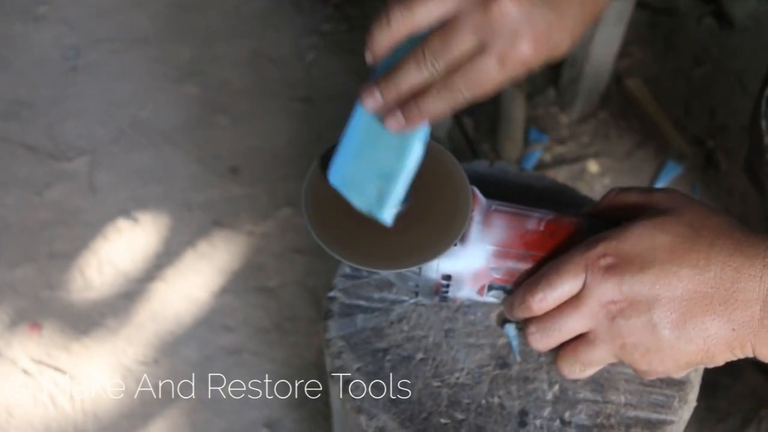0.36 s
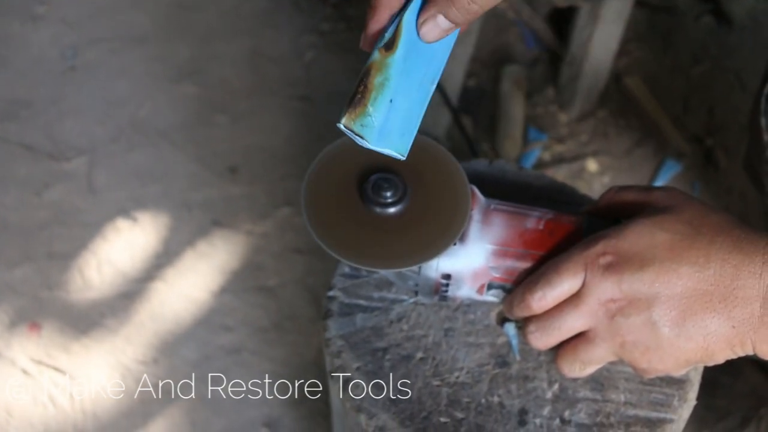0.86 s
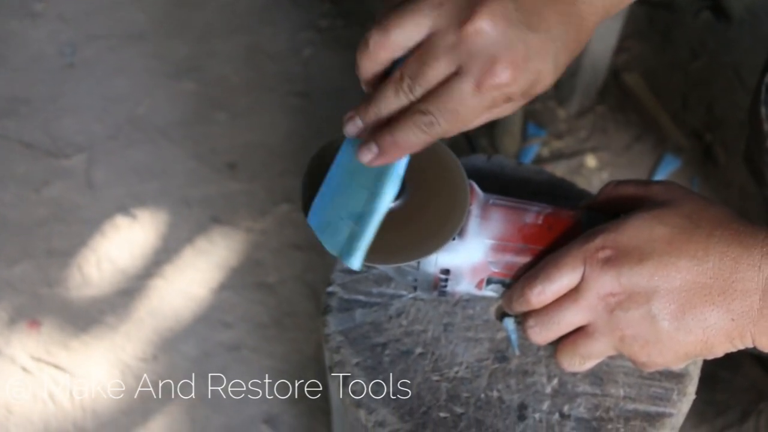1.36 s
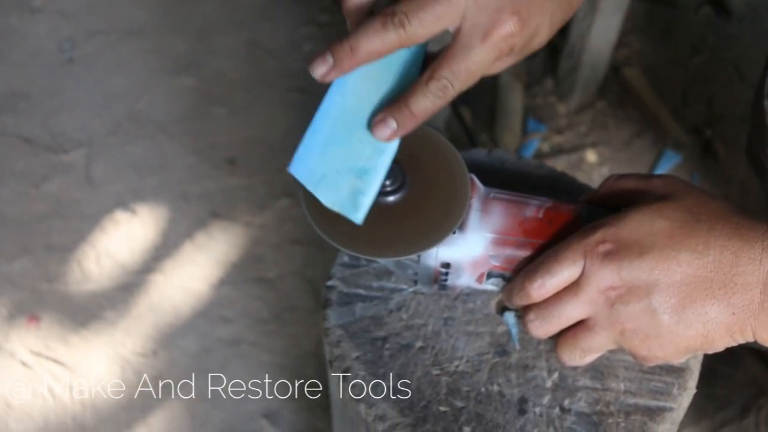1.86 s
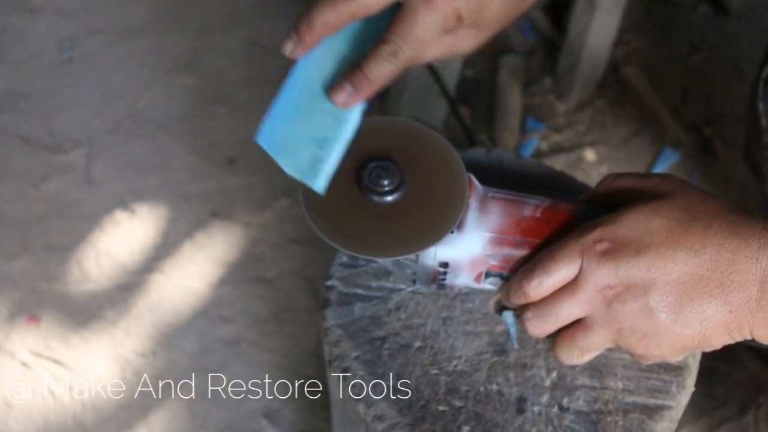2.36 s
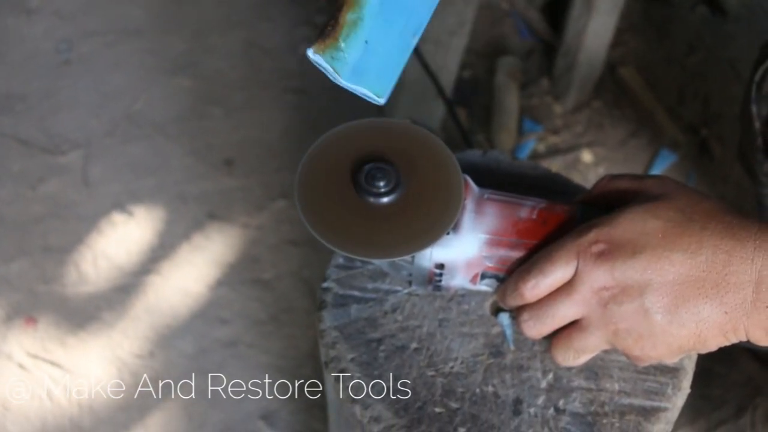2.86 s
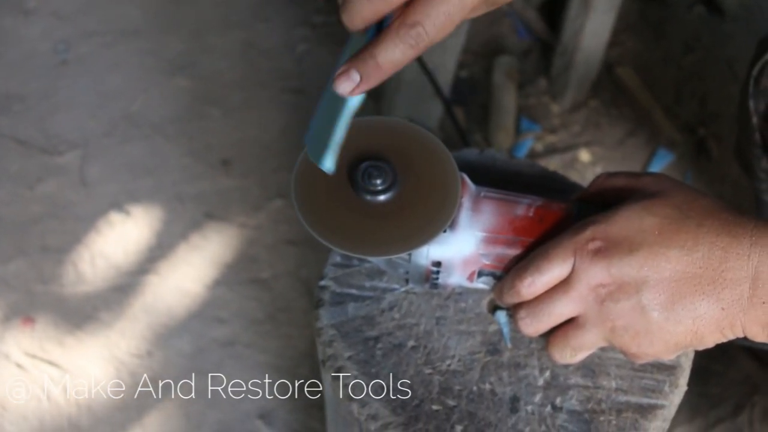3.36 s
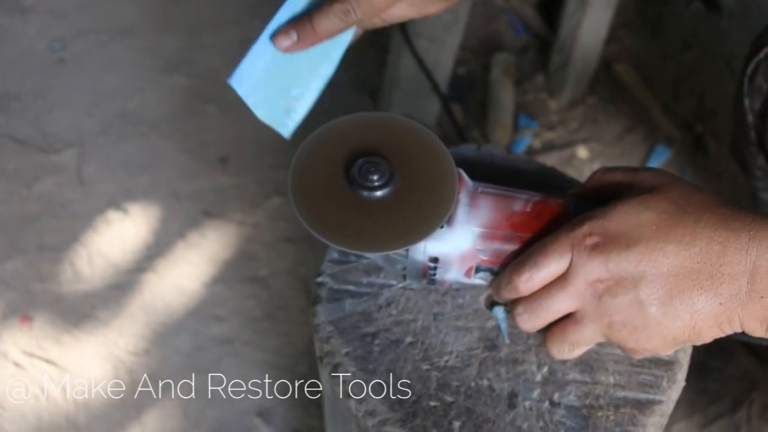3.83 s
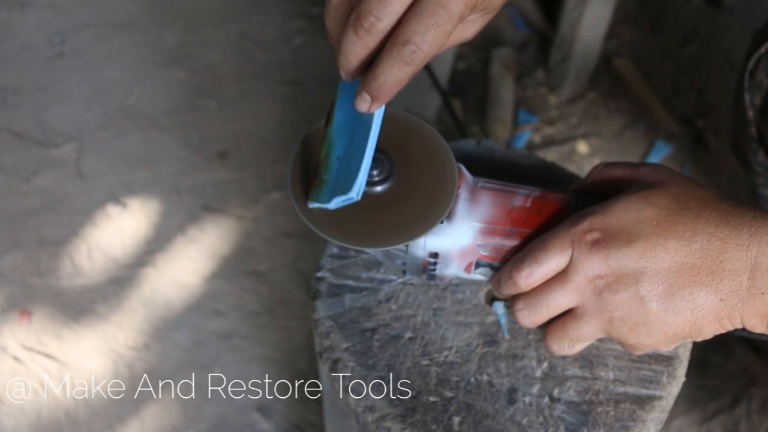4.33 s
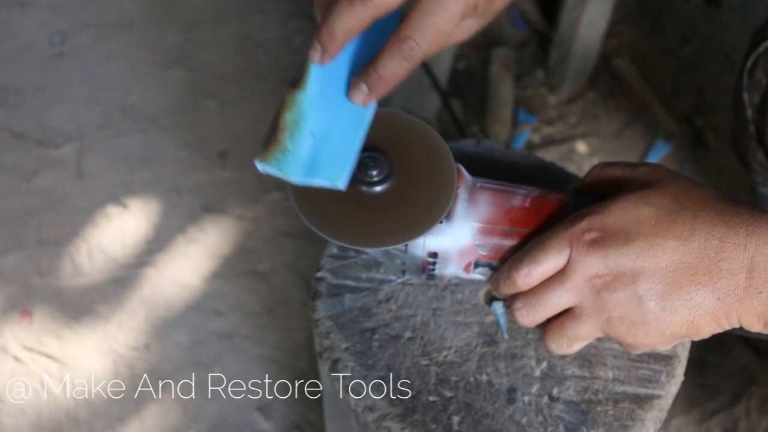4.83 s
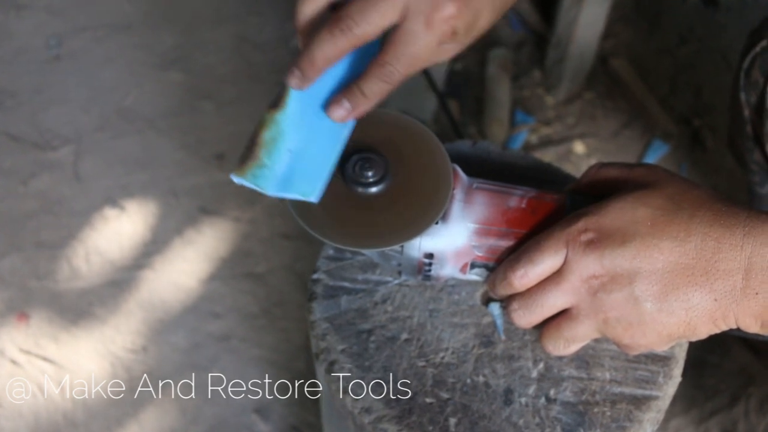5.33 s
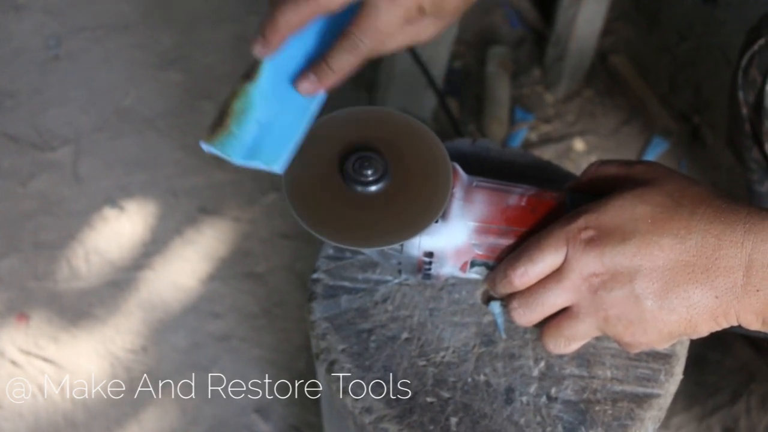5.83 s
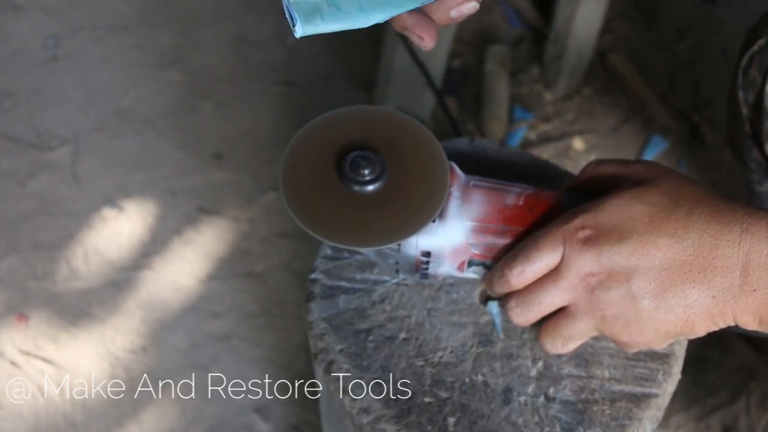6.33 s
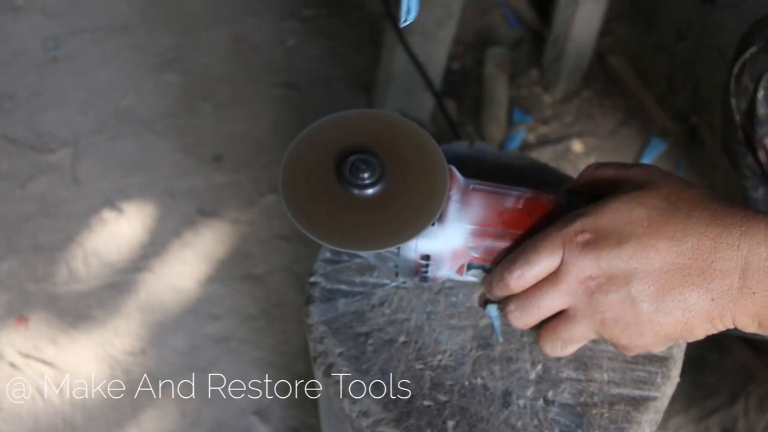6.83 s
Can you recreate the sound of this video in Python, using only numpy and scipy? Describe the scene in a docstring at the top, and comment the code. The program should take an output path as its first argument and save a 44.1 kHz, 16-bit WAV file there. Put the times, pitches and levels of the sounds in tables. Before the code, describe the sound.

Close, mono and dry: a free-running electric grinder with a shrill blade whine, fainter higher overtone and broad airy roar. Brief scratchy zips of plastic on abrasive come singly and in clusters, strongest at the start and in the sixth second, with gaps of plain whirring between. Low room rumble and soft distant wooden thumps sit underneath; the last second is just the motor.

```python
"""A small angle grinder runs free on a wooden block in a workshop: a fan roar, a blade whine, bar and shaft tones.
Plastic pipe is swept over its abrasive disc in short strokes: noise shaped by disc modes hisses, narrow tones squeal,
and the motor, whose armature phase drives every steady tone, slows down.
Far off something knocks on wood, as soft puffs of low noise, over a low rumble of block and room.
One microphone takes it all in mono; its automatic gain control ducks the loud moments and recovers slowly."""
import sys
import numpy as np
from scipy import signal
from scipy.fft import rfft, irfft, next_fast_len
from scipy.io import wavfile
from scipy.ndimage import uniform_filter1d, map_coordinates

SR = 44100
rng = np.random.default_rng(int(sys.argv[2]) if len(sys.argv) > 2 else 0)


def amp(db):
    return 10 ** (np.asarray(db, float) / 20)


def write(x):
    x = np.atleast_2d(x).T
    wavfile.write(sys.argv[1], SR, np.round(np.clip(x, -1, 1) * 32767).astype(np.int16))


N = 306495  # length in samples

BLADES, DISC_PER_ARMATURE = 12, 13 / 37  # fan blades, disc turns for one armature turn
MAINS_BEAT_HZ = 100  # torque pulses at twice the mains
START_WHINE_HZ, RECOVER_S = 5795, 0.6  # whine at the start, time constant of the motor speed
BARS_DB, SHAFT_DB = -32, -41  # mean rms at the microphone: commutator bars, armature unbalance
BAND_TOP_HZ = 15730  # upper limit of the recorded band

# The speed the motor heads for; it sags when the pipe brushes the disc too lightly to hiss.
# Each row: time in seconds, blade whine in Hz.
FREE_SPEED = [(0.0, 5880), (0.96, 5885), (1.12, 5984), (2.75, 5926), (3.25, 5962), (4.19, 5952),
              (4.83, 5844), (5.12, 5985), (7.0, 5977)]
# The pipe brakes the disc. Each row: start in seconds, end in seconds, whine Hz lost a second.
BRAKING = [(0, .065, 1000), (.312, .433, 663), (1.449, 1.607, 289), (2.023, 2.106, 321), (2.29, 2.361, 520),
           (2.53, 2.608, 757), (3.745, 3.845, 92), (4.288, 4.492, 55), (4.511, 4.679, 243),
           (5.015, 5.15, 340), (5.32, 5.426, 325), (5.578, 5.685, 491), (5.798, 5.894, 639)]
# Blade whine, shaded and reflected by the moving hand and pipe. Each row: time in seconds, level in dB.
WHINE = [(0, -15.5), (.08, -22.5), (.2, -18.5), (.45, -25), (.75, -19), (1.1, -20.5), (1.28, -22.5),
         (1.48, -18), (1.62, -21.5), (2.15, -22), (2.45, -23.5), (2.9, -23), (3.19, -18.5), (3.38, -21.5),
         (3.56, -18.5), (3.72, -21.5), (3.93, -19.5), (4.3, -21.5), (4.75, -22), (5.9, -23.5), (6.2, -21.5),
         (6.9, -23.5)]
# Weaker steady tones of the motor. Each row: multiple of the armature speed, level in dB.
ARMATURE_ORDERS = [(2, -41.5), (3, -52), (4, -50), (5, -46), (6, -48), (7, -48), (13.71, -53)]
# Unbalance of the disc. Each row: multiple of the disc speed, level in dB.
DISC_ORDERS = [(1, -67.5), (2, -61.5)]
# Fan roar while hand and pipe shade the air slots. Each row: time in seconds, level from 700 to 2000 Hz in dB.
ROAR = [(0, -24.5), (.45, -28), (.7, -26.5), (1.5, -27), (1.65, -28), (2.4, -28), (3.2, -26.5),
        (4.5, -27.5), (4.75, -28.5), (4.95, -27), (5.5, -28), (6.95, -26.5)]
# Spectrum of the cooling air. Each row: frequency in Hz, relative density in dB per Hz.
AIR = [(150, -64), (250, -24), (458, -18.5), (483, -19), (626, -15), (901, -8.5), (2220, -10), (5460, -6.5),
       (5750, -6), (6600, -10), (11100, -20), (12100, -15), (15700, -18.5)]
# Housing resonances and dips that colour the roar. Each row: frequency in Hz, width in Hz, lift in dB.
HOUSING = [(831, 270, 7), (1526, 640, 5.5), (1946, 270, 6.5), (2690, 310, 2.5), (3200, 83, -2.5),
           (3380, 510, 3.5), (4140, 360, 3.5), (4320, 170, -3), (4850, 330, 4.5), (6570, 120, -3),
           (6940, 280, -6), (8500, 2900, 8), (13900, 980, 4)]
# Strokes of the pipe over the disc. Each row: start in seconds, end in seconds,
# then the drive of the low, middle and high modes in dB.
STROKES = [(0, 0.07, -18, -24.5, -23), (.297, 0.407, -21, -24.5, -28.5), (.412, 0.45, -22, -31, -31),
           (1.42, 1.606, -28, -28, -30.5), (1.984, 2.112, -26, -29, -26), (2.272, 2.28, -29, -24, -22),
           (2.288, 2.355, -22, -26, -26), (2.518, 2.6, -21, -29, -25), (3.73, 3.81, -21.5, -25, -25),
           (4.292, 4.454, -31, -30, -26.5), (4.455, 4.61, -37.5, -32, -28), (4.652, 4.698, -38, -34, -27),
           (4.983, 5.1, -29.5, -28.5, -26), (5.1, 5.158, -23, -28, -22), (5.31, 5.331, -30, -21, -19),
           (5.328, 5.417, -27, -26, -26), (5.55, 5.686, -25.5, -27, -27), (5.797, 5.89, -26, -26, -24)]
# Modes of the rubbed disc and pipe. Each row: frequency in Hz, width in Hz, relative gain in dB.
DISC_MODES = [(2250, 700, 4.5), (4400, 460, 5), (6350, 260, 14.5), (8300, 1030, 8), (9050, 1000, 3),
              (10400, 290, -13), (12900, 290, 6), (13800, 680, 3.5), (14400, 240, 1), (14900, 450, -3)]
# Broad scrape of the grit under the modes. Each row: frequency in Hz, width in Hz, relative gain in dB.
SCRAPE = [(3670, 1500, 0.5), (8000, 2100, 3), (13800, 2600, -4)]
# The pipe edge sticks, slips and sings. Each row: start in seconds, end in seconds, frequency in Hz,
# peak level in dB before it turns unsteady.
SQUEALS = [(.005, 0.054, 3720, -23), (.023, .06, 5030, -30), (0, .07, 6350, -22), (.326, .388, 6740, -27),
           (.34, .4, 8450, -28), (1.427, 1.58, 8900, -33), (1.995, 2.04, 9050, -23),
           (1.997, 2.1, 13850, -37), (2, 2.06, 2140, -30), (2.294, 2.345, 6300, -21),
           (2.272, 2.348, 7880, -26), (2.33, 2.37, 13400, -30), (2.523, 2.602, 6350, -25),
           (2.55, 2.587, 7660, -23), (4.3, 4.44, 13800, -39), (4.46, 4.6, 15150, -40),
           (4.5, 4.615, 14400, -39), (4.655, 4.69, 14050, -39), (4.995, 5.09, 8970, -27.5),
           (4.99, 5.1, 13800, -35), (5.03, 5.1, 10400, -32), (5.113, 5.16, 9400, -31),
           (5.032, 5.096, 2270, -28), (5.313, 5.407, 4400, -25), (5.322, 5.396, 2250, -29),
           (5.35, 5.397, 9300, -25), (5.58, 5.632, 4710, -27), (5.622, 5.657, 4360, -22),
           (5.58, 5.633, 6330, -30), (5.63, 5.66, 9130, -25), (5.795, 5.845, 4700, -24),
           (5.82, 5.883, 4400, -21), (5.85, 5.883, 8960, -23)]
# Far blows on wood. Each row: time of the peak in seconds, rms level at the peak in dB.
KNOCKS = [(0.284, -31), (0.765, -35), (1.244, -37.5), (1.76, -41), (2.204, -43), (2.721, -34),
          (3.188, -29.5), (3.652, -38), (4.137, -39)]
# Spectrum of the far blows. Each row: frequency in Hz, relative density in dB per Hz.
WOOD = [(60, -37), (120, -10.5), (200, -5.5), (380, -0.5), (600, 0.5), (1000, -15.5)]
# Spectrum of the rumble of block and room. Each row: frequency in Hz, relative density in dB per Hz.
RUMBLE = [(20, -40), (45, -6), (55, 0), (75, -3.5), (100, 0), (125, -2), (200, 2), (300, -3), (450, -20)]


def armature_turns():
    """Turns of the armature so far: its speed lags behind the free speed and is braked by the pipe."""
    t = np.arange(N) / SR
    drag = sum(rate * ((t > start) & (t < end)) for start, end, rate in BRAKING)
    target_hz = curves(FREE_SPEED)[0] - RECOVER_S * drag
    keep = np.exp(-1 / (RECOVER_S * SR))
    change_hz = signal.lfilter([1 - keep], [1, -keep], target_hz - START_WHINE_HZ)
    whine_hz = START_WHINE_HZ + change_hz
    return np.cumsum(whine_hz) / SR / BLADES  # the whine has one period a blade


def motor_tones():
    """Blade whine, commutator bars at twice that, shaft and disc orders, all locked to the armature."""
    turns = armature_turns()
    whine_db = curves(WHINE)[0] + 0.87 * wobble(16)
    bars_db = BARS_DB + 1.53 * wobble(14)  # brush contact wanders
    shaft_db = SHAFT_DB + 0.87 * wobble(2.95)
    ripple = np.sin(2 * np.pi * MAINS_BEAT_HZ * np.arange(N) / SR)
    shake = 0.0033 * ripple + 0.0051 * wobble(180)  # in blade periods
    out = tone(BLADES * turns + shake, whine_db, flutter_db=0.81, rate=86)
    out += tone(2 * BLADES * turns + 3 * shake, bars_db, flutter_db=0.74, rate=73)
    out += tone(turns, shaft_db, flutter_db=0.3, rate=43)
    for order, db in ARMATURE_ORDERS:
        out += tone(order * turns, db, flutter_db=2.5, rate=16)
    for order, db in DISC_ORDERS:
        out += tone(order * DISC_PER_ARMATURE * turns, db, flutter_db=5.0, rate=24)
    return out


def tone(turns, db, flutter_db, rate):
    """A sine on the given phase in turns, its rms level fluttering about db."""
    level = amp(db + flutter_db * wobble(rate))
    return np.sqrt(2) * level * np.sin(2 * np.pi * (turns + rng.random()))


def fan_roar():
    """Turbulent cooling air: noise coloured by the housing and slightly gusty."""
    def air_gain(f):
        lift_db = sum(db * abs(resonance(f, hz, width_hz)) ** 2 for hz, width_hz, db in HOUSING)
        return coloured(AIR)(f) * amp(lift_db)

    air = filtered(rng.standard_normal(N), air_gain)
    body = filtered(air, lambda f: (f > 700) & (f < 2000))  # the band that sets the level
    gusts_db = 0.49 * wobble(14) + 0.44 * wobble(250)
    return amp(curves(ROAR)[0] + gusts_db) * air / np.std(body)


def grinding():
    """Grit scrapes the plastic; every mode swells and fades by itself as the grip shifts."""
    roughness = amp(1.8 * wobble(500) + 1.2 * wobble(60))
    grit = rng.standard_normal(N) * once_a_turn(depth_db=2) * roughness
    f, t, spectrum = signal.stft(grit, SR, nperseg=256, noverlap=192)

    def stroke_drive(column):
        return sum(amp(row[column]) * touch(t, row[0], row[1], rise_s=0.014, fall_s=0.015) for row in STROKES)

    low, middle, high = stroke_drive(2), stroke_drive(3), stroke_drive(4)
    power = 0
    for hz, width_hz, db in DISC_MODES + SCRAPE:
        drive = low if hz < 5400 else middle if hz < 11500 else high
        swell = np.interp(t * SR, np.arange(N), amp(2.1 * wobble(35)))
        power = power + np.outer(abs(resonance(f, hz, width_hz)), drive * amp(db) * swell) ** 2
    return signal.istft(spectrum * np.sqrt(power), SR, nperseg=256, noverlap=192)[1][:N]


def squeals():
    """Broken, unsteady tones: slips repeat with scatter, so each line is a narrow band."""
    out, t = np.zeros(N), np.arange(N) / SR
    unsteady = once_a_turn(depth_db=3.5) * amp(2.5 * wobble(70))
    scatter = 0.11 * wobble(400) + 0.3 * wobble(40)  # in slip periods
    for start, end, hz, db in SQUEALS:
        on = slice(max(round((start - 0.01) * SR), 0), round((end + 0.01) * SR))
        slips = hz * t[on] + scatter[on]
        contact = touch(t[on], start, end, rise_s=0.0089, fall_s=0.012)
        out[on] += amp(db) * contact * np.sin(2 * np.pi * slips)
    return out * unsteady


def once_a_turn(depth_db):
    """The disc runs a little out of true and bites hardest once a turn."""
    return amp(depth_db * np.cos(2 * np.pi * DISC_PER_ARMATURE * armature_turns()))


def touch(t, start, end, rise_s, fall_s):
    """1 during a contact, with soft edges."""
    return np.clip((t - start) / rise_s + 0.5, 0, 1) * np.clip((end - t) / fall_s + 0.5, 0, 1)


def far_knocks():
    """Dull blows on wood: walls on the way smear each one into a soft low puff."""
    t = np.arange(N) / SR
    puffs = np.zeros(N)
    for peak_s, db in KNOCKS:
        since = np.clip((t - peak_s) / 0.011 + 1, 0, 40)  # in rise times of 11 ms
        puffs += amp(db) * since * np.exp(1 - since)
    return puffs * unit(filtered(rng.standard_normal(N), coloured(WOOD)))


def workshop():
    """Low rumble of the block and the room: steady noise at a low level."""
    return amp(-57.5) * unit(filtered(rng.standard_normal(N), coloured(RUMBLE)))


def unit(x):
    """Scaled to rms 1."""
    return x / np.sqrt(np.mean(x ** 2) + 1e-20)


def curves(rows):
    """One value per sample for each column after the time."""
    s, *columns = np.transpose(rows)
    return [np.interp(np.arange(N) / SR, s, column) for column in columns]


def wobble(rate):
    """A smooth random curve, rate knots a second."""
    coarse = np.arange(0, N + 32, 32)  # the spline is drawn every 32 samples
    knots = rng.standard_normal(int(N * rate / SR) + 4)
    return np.interp(np.arange(N), coarse, map_coordinates(knots, [coarse * rate / SR]))


def filtered(x, response):
    """x filtered by a complex response of frequency."""
    m = next_fast_len(len(x) + 4096)
    return irfft(rfft(x, m) * response(np.fft.rfftfreq(m, 1 / SR)), m)[:len(x)]


def resonance(f, hz, width_hz):
    """One causal resonance of peak gain 1."""
    return 1j * f * width_hz / (hz * hz - f * f + 1j * f * width_hz)


def coloured(spectrum):
    """The gain of (Hz, dB) points on a log axis, as a function of frequency."""
    hz, db = np.transpose(spectrum)
    return lambda f: amp(np.interp(np.log(f + 1), np.log(hz), db))


def scene():
    """Everything reaches one microphone, the same on both channels."""
    grinder = motor_tones() + fan_roar() + grinding() + squeals()
    return np.tile(grinder + workshop() + far_knocks(), (2, 1))


def gain_control(x, limit_db, share, window_s, back_db):
    """Gain drops when the level passes the limit and creeps back by back_db a second."""
    level_db = 10 * np.log10(abs(uniform_filter1d(x[0] ** 2, round(window_s * SR))) + 1e-12)
    cut_db = np.clip(share, 0, 1) * np.maximum(level_db - limit_db, 0)
    ramp = back_db * np.arange(N) / SR
    held_db = np.maximum.accumulate(cut_db + ramp) - ramp
    return x * amp(-uniform_filter1d(held_db, round(0.012 * SR)))  # smoothed over 12 ms


def low_pass(x):
    """Removes everything above the highest recorded frequency."""
    return signal.sosfilt(signal.butter(12, 15950, fs=SR, output="sos"), x)


def record(dry):
    """The microphone's gain control, then the band limit."""
    steady = gain_control(dry, limit_db=-17, share=0.66, window_s=0.018, back_db=6.5)
    narrow = np.array([filtered(channel, lambda f: f < BAND_TOP_HZ) for channel in steady])
    return low_pass(narrow)


dry = scene()
out = record(dry)
write(out)
```